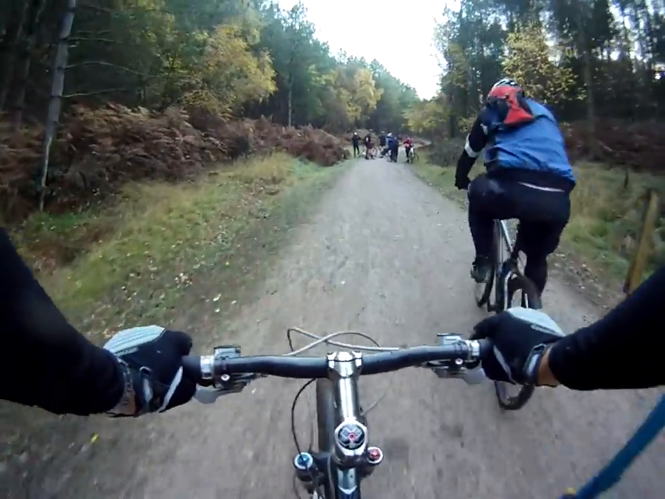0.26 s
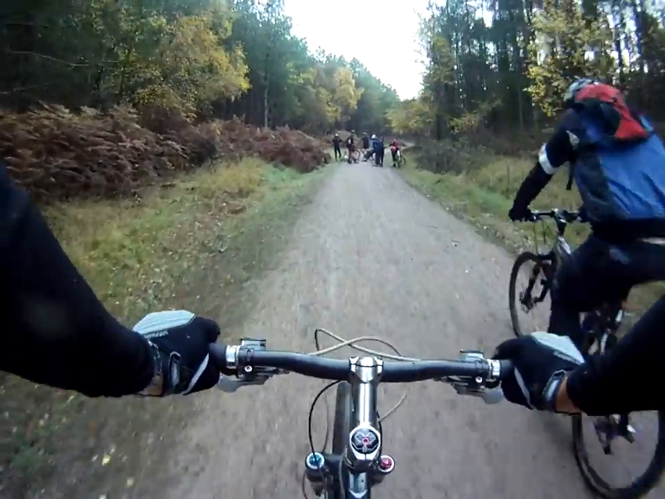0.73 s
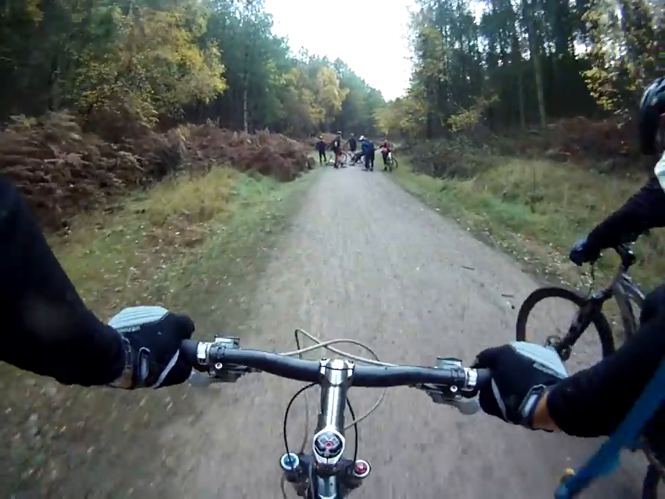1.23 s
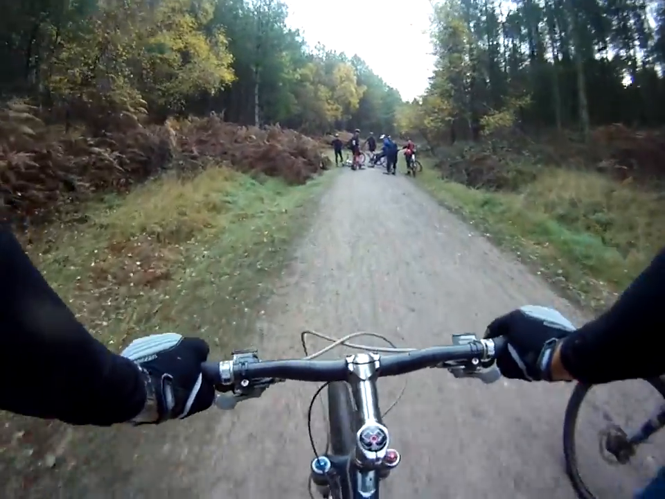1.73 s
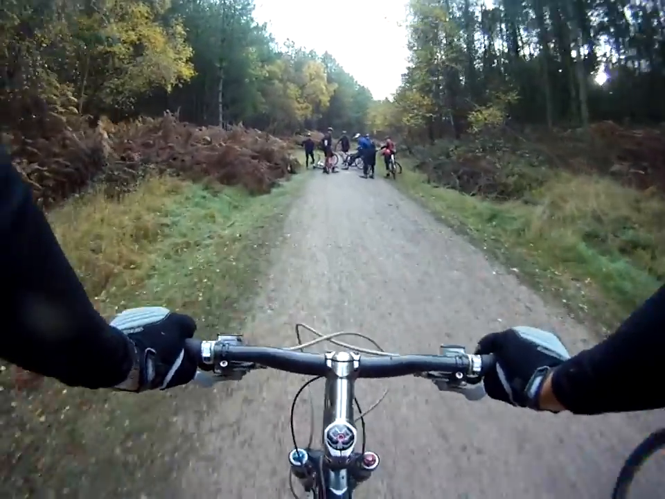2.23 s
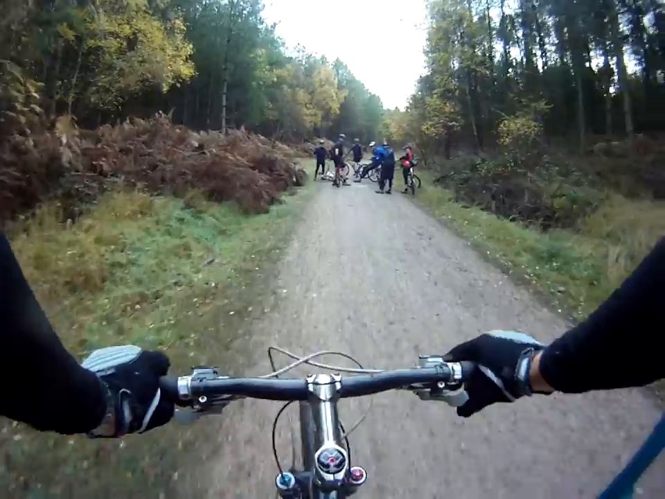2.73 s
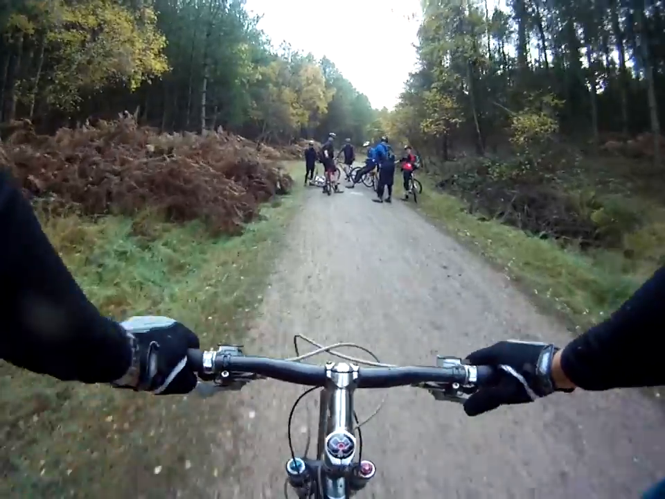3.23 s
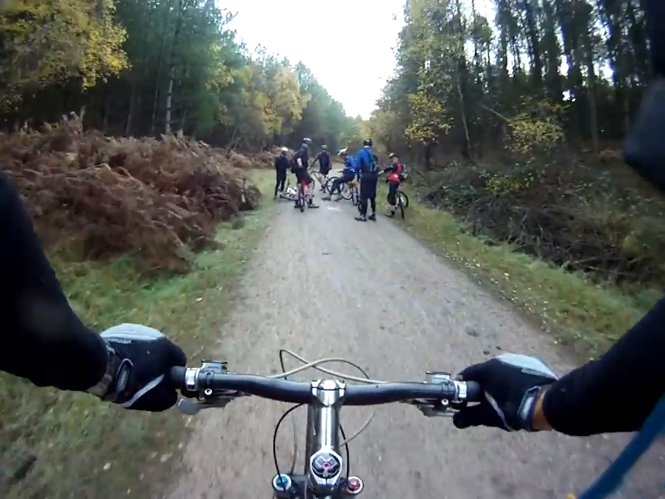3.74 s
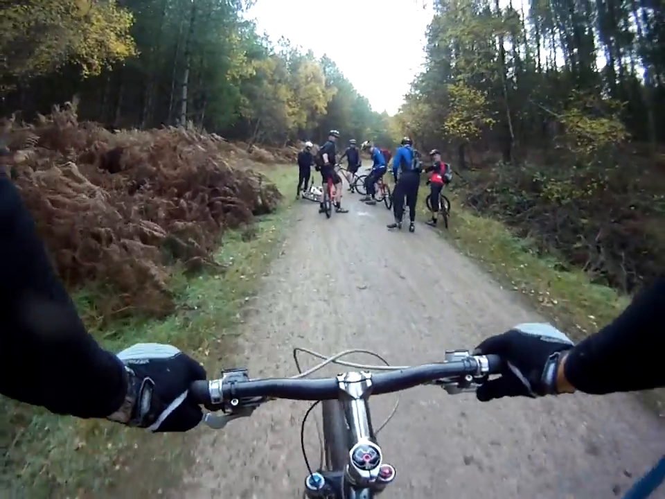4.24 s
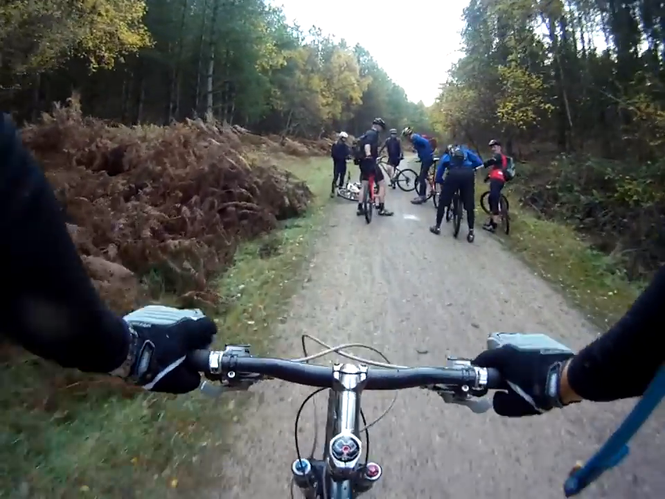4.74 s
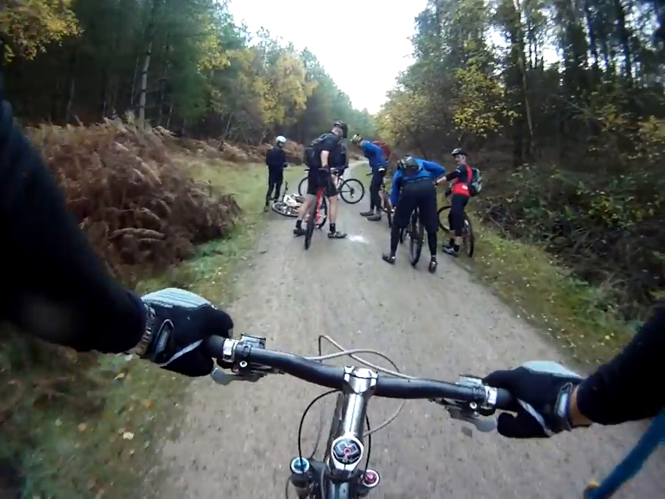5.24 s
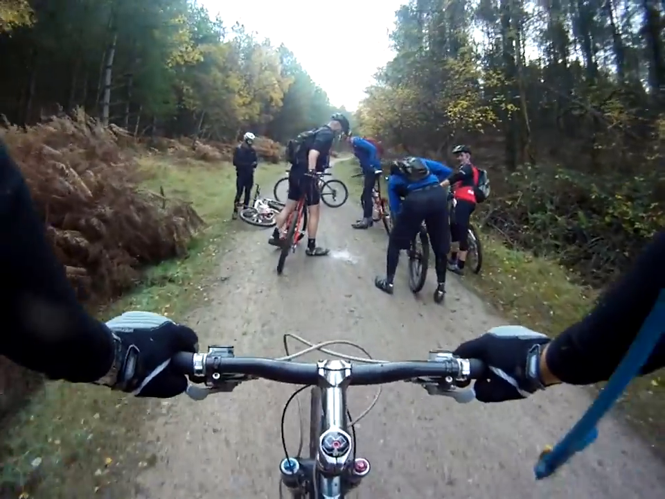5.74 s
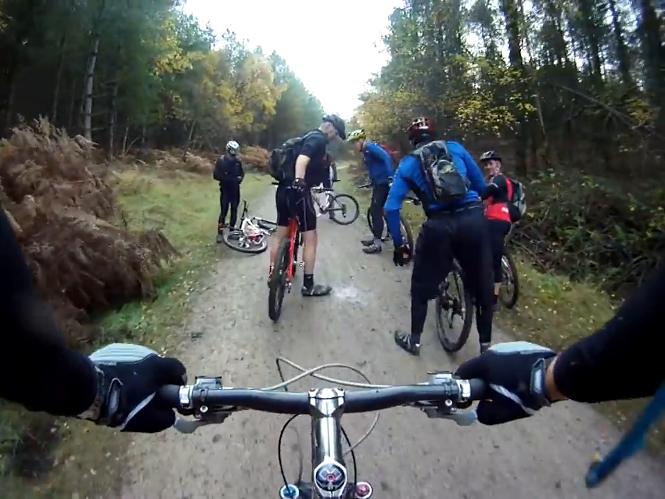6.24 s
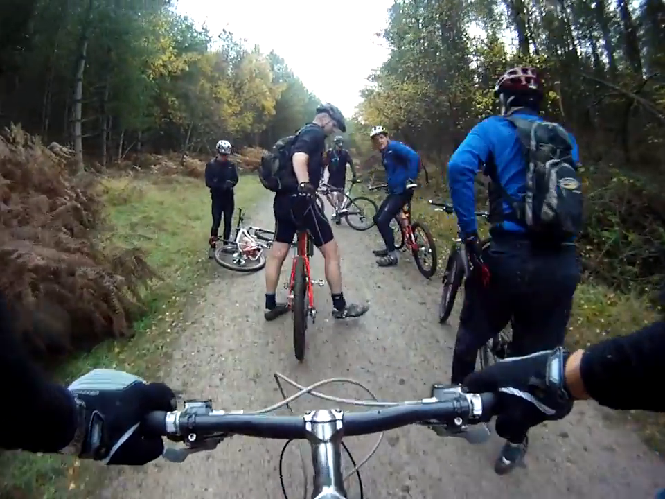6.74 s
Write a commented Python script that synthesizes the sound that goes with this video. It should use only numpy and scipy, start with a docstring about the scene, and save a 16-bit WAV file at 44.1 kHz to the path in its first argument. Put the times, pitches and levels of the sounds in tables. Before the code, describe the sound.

A continuous close, boxy sound of a mountain bike on a gravel forest track, picked up by a cased camera on the rider's chest. It starts fast, with low wind, dense tyre rumble, gritty crunch and a hard clack near 0.1 s, among many stone ticks. By 0.5 s the speed has dropped; jacket scuffs and knocks come around 0.7 to 1.0 s. From about 0.8 to 2.5 s low flutters swell over ruts, with a dull knock near 2.6 s. From 3.1 to 4.8 s the ticks and clacks are hardest, with piercing snaps around 3.6 and 3.7 s, rattling knocks near 3.95 s and a strong low shudder near 4.8 s. Then rolling is gentler, with cloth rubs, a double knock at 5.7 s and further thuds around 6.5 s. Pebbles tick randomly and a glassy fizz covers everything until the end.

```python
"""A mountain bike coasts down a gravel track, heard from a small cased camera on the rider's chest.
It starts fast in wind, tyre rumble (clicks in case resonances) and crunch (clicks in case-wall resonances).
Speed drops within 0.5 s; from 0.8 s to 2.5 s ruts flutter low. From 3.1 s to 4.8 s ticks, knocks and bright
hard clicks, all resonated pushes, are hardest. The slower end has jacket rubs (clicks in fabric resonances)
and knocks. Throughout, small stones tick at random and the camera's held samples put a glassy fizz on top."""
import sys
import numpy as np
from scipy import signal
from scipy.fft import rfft, irfft
from scipy.io import wavfile
from scipy.ndimage import uniform_filter1d

SR = 44100
rng = np.random.default_rng(int(sys.argv[2]) if len(sys.argv) > 2 else 0)


def generate_wav(sig):
    """Save sig (samples, or channels by samples) to the path in sys.argv[1] as 16-bit PCM at SR."""
    pcm = np.round(np.clip(np.atleast_2d(sig).T, -1, 1) * 32767).astype(np.int16)
    wavfile.write(sys.argv[1], SR, pcm)


N = 307818
TIME_S = np.arange(N) / SR


def from_db(db):
    """Amplitude factor of a level in dB."""
    return 10 ** (np.asarray(db) / 20)


def rms_one(x):
    """Scaled to rms 1."""
    return x / np.sqrt(np.mean(x ** 2) + 1e-20)


def peak_one(x):
    """Scaled to peak 1."""
    return x / (np.abs(x).max() + 1e-20)


def low_pass(x, hz, order=2):
    """Causal Butterworth low-pass."""
    return signal.sosfilt(signal.butter(order, hz, fs=SR, output="sos"), x)


def drift(turns_per_s):
    """Smooth random curve of rms 1, with about that many turns a second."""
    hz = np.arange(N // 2 + 1) * SR / N
    spectrum = rfft(rng.standard_normal(N)) / (1 + (hz / turns_per_s) ** 2)
    return rms_one(irfft(spectrum, N))


def in_time(rows):
    """Curve at every sample, straight between rows of (s, value)."""
    return np.interp(TIME_S, *np.transpose(rows))


def resonate(x, hz, width_hz):
    """One two-pole resonance with gain about 1 at its top."""
    r = np.exp(-np.pi * width_hz / SR)
    zeros = np.array([1, 0, -1]) * (1 - r * r) / 2
    poles = [1, -2 * r * np.cos(2 * np.pi * hz / SR), r * r]
    return signal.lfilter(zeros, poles, x + 1e-18)


def body(x, modes):
    """Parallel resonances with alternating signs."""
    out = 0
    for k, (hz, width_hz, db) in enumerate(modes):
        out = out + (-1) ** k * from_db(db) * resonate(x, hz, width_hz)
    return out


def grains(per_s, spread_db, cap):
    """Random clicks of either sign; a positive spread makes a few large, a negative one a few small."""
    excess_db = spread_db * np.minimum(rng.exponential(1, N), cap)
    sizes = from_db(excess_db) * rng.choice([-1, 1], N)
    return sizes * (rng.random(N) < per_s / SR)


def contact(chatter, decay_s):
    """One sharp push, with dying chatter as the surfaces settle."""
    t = TIME_S[:SR // 12]
    return (t == 0) + chatter * rng.standard_normal(len(t)) * np.exp(-t / decay_s)


def add(track, s, sound):
    """Mixes a sound into the track at time s."""
    at = int(np.clip(round(s * SR), 0, N - 1))
    track[at:at + len(sound)] += sound[:N - at]


# Wind spectrum at the microphone. Each row: frequency in Hz, relative level in dB per Hz.
WIND_SPECTRUM = [(12, -14), (25, -6.5), (40, -5), (60, -1), (80, -3.5), (105, -4.5), (150, -15.5),
                 (220, -27), (400, -31), (1000, -36.5)]


def wind():
    """Air stream as shaped noise, its short-term level evened out."""
    hz, db = np.transpose(WIND_SPECTRUM)
    bins_hz = np.arange(N // 2 + 1) * SR / N + 1e-3
    colour = from_db(np.interp(np.log(bins_hz), np.log(hz), db, left=-40, right=-90))
    air = irfft(rfft(rng.standard_normal(N)) * colour, N)
    return air / np.sqrt(uniform_filter1d(air ** 2, SR // 6))


# Rutted stretches that shake the frame. Each row: middle in s, length in s, extra shudder in dB.
RUTS = [(1.053, 0.5, 4.5), (1.826, 0.38, 7.5), (2.303, 0.3, 6.5), (3.08, 0.26, 5.5), (3.562, 0.34, 10.5),
        (4.245, 0.057, 11), (4.41, 0.063, 9), (4.83, 0.63, 13), (6.52, 0.1, 14)]


def ruts():
    """Extra shaking in dB: a parabolic swell over each rutted stretch."""
    extra_db = 0
    for middle_s, length_s, db in RUTS:
        extra_db = extra_db + db * np.maximum(1 - (2 * (TIME_S - middle_s) / length_s) ** 2, 0)
    return extra_db


def shudder():
    """Shaking of frame and rider: a dull low flutter of clicks through two resonances."""
    shakes = grains(900, spread_db=1.5, cap=5.1)
    return rms_one(resonate(resonate(shakes, 147, 133), 152, 150))


# Boom of case and mount. Each row: frequency in Hz, width in Hz, relative level in dB.
BOOM_MODES = [(227, 42, -1), (301, 120, 3.5), (430, 109, 5.5), (529, 129, 7.5), (629, 304, -2.5)]
# Rasp of the fabric weave. Each row: frequency in Hz, width in Hz, relative level in dB.
WEAVE_MODES = [(1460, 780, 7), (2550, 800, 14.5), (3330, 270, 13), (4070, 1130, 0)]
# Jacket rubs on the case. Each row: start in s, rise in s, fall in s, scuff in dB, rasp in dB.
RUBS = [(0.033, 0.018, 0.023, -50, -33.5), (0.094, 0.02, 0.14, -33.5, -39.5),
        (0.689, 0.029, 0.25, -24, -36.5), (0.99, 0.0066, 0.075, -27.5, -36), (4.04, 0.01, 0.033, -34, -47),
        (5.232, 0.023, 0.19, -35.5, -43.5), (5.723, 0.012, 0.037, -28, -34),
        (5.828, 0.02, 0.11, -37.5, -49), (6.365, 0.017, 0.0087, -39, -35.5),
        (6.556, 0.025, 0.063, -30, -37), (6.612, 0.078, 0.21, -35.5, -46.5),
        (6.885, 0.013, 0.018, -49, -38.5)]
SWISH_HZ, SWISH_WIDTH_HZ = 4500, 1340
# swish under the scuff of a hard rub, the scuff level of such a rub, extra swish dB per scuff dB
SWISH_DB, HARD_RUB_DB, SWISH_GROWTH = -14.5, -23.5, 0.56


def rubs():
    """Cloth sticks and slips on the case: hollow scuff, rasp, and a swish that grows with the scuff."""
    slips = grains(1200, spread_db=3.0, cap=3.5)
    scuff = rms_one(low_pass(body(slips, BOOM_MODES[1:]), 1200))
    rasp = rms_one(body(slips + 0.14 * rng.standard_normal(N), WEAVE_MODES))
    swish = resonate(slips, SWISH_HZ, SWISH_WIDTH_HZ)
    swish = rms_one(resonate(swish, SWISH_HZ, SWISH_WIDTH_HZ))
    out = np.zeros(N)
    for s, rise_s, fall_s, scuff_db, rasp_db in RUBS:
        pressure = np.interp(TIME_S - s, [0, rise_s, rise_s + fall_s], [0, 1, 0]) ** 0.66
        swish_db = scuff_db + SWISH_DB + SWISH_GROWTH * (scuff_db - HARD_RUB_DB)
        rub = from_db(scuff_db) * scuff + from_db(rasp_db) * rasp + from_db(swish_db) * swish
        out += pressure * rub
    return out


# Knocks and bright hard clicks, some with hardly any thud. Each row: time in s, thud peak in dB,
# thud pitch in Hz, clack level in dB, clack pitch in Hz, chatter decay in s, gap to the first rebound
# in s (2 ms or less: no rebound).
KNOCKS_AND_CLICKS = [(0.084, -18.5, 600, -11, 2110, 0.01, 0.0031),
                     (0.728, -17, 465, -31, 2520, 0.0034, 0.039),
                     (1.001, -20.5, 593, -18.5, 3500, 0.0079, 0.0047),
                     (1.213, -38, 1000, -19.5, 1730, 0.002, 0.0011),
                     (2.577, -16, 342, -24.5, 2620, 0.0021, 0),
                     (3.473, -31, 1050, -18, 2100, 0.0017, 0.0011),
                     (3.6197, -27, 596, -13, 4670, 0.0013, 0.0036), (3.708, -20, 600, -5, 2400, 0.00088, 0),
                     (3.9208, -44, 602, -16.5, 4560, 0.00063, 0.00027),
                     (3.935, -15.5, 404.7, -9, 4500, 0.0017, 0.0066),
                     (3.954, -13, 700, -19.5, 1100, 0.00096, 0.0024),
                     (4.017, -25, 628, -39, 2800, 0.006, 0),
                     (4.573, -28.5, 840, -16.5, 3700, 0.0025, 0.0027),
                     (4.756, -17, 549, -22, 2250, 0.0038, 0.0047),
                     (4.806, -15, 517, -19, 2340, 0.0023, 0.0009),
                     (5.709, -11.5, 394, -13.5, 2150, 0.0028, 0.031),
                     (5.712, -19, 1070, -9, 2600, 0.003, 0.0011),
                     (6.305, -23.5, 526.2, -38, 1180, 0.0082, 0),
                     (6.505, -15.5, 430, -27.5, 2569, 0.0027, 0.0026),
                     (6.56, -23.5, 510, -23, 2100, 0.022, 0.00055),
                     (6.689, -19.5, 492, -25.5, 2220, 0.0073, 0)]
REBOUND_GAP_RATIO, REBOUND_THUD_LOSS_DB, REBOUND_CLACK_LOSS_DB = 0.46, 3.5, 12.5


def hits():
    """Every knock or click; some rebound twice, each time sooner and softer, the clack fading faster."""
    for s, thud_db, thud_hz, clack_db, clack_hz, decay_s, gap_s in KNOCKS_AND_CLICKS:
        for k in range(3 if gap_s > .002 else 1):
            hit_thud_db = thud_db - k * REBOUND_THUD_LOSS_DB
            hit_clack_db = clack_db - k * REBOUND_CLACK_LOSS_DB
            yield s, hit_thud_db, thud_hz, hit_clack_db, clack_hz, decay_s
            s = s + gap_s * REBOUND_GAP_RATIO ** k


# Ring of plastic struck directly. Each row: frequency in Hz, width in Hz, relative level in dB.
PLASTIC_MODES = [(1100, 270, 0), (2100, 130, 11.5), (2800, 710, 8.5), (3500, 140, -4), (4600, 370, -21)]


def knocks_and_clicks():
    """Each hit sums a hollow thud, at times very faint, and a hard clack at its own pitch."""
    out = np.zeros(N)
    for s, thud_db, thud_hz, clack_db, clack_hz, decay_s in hits():
        push = resonate(contact(chatter=0.053, decay_s=decay_s), thud_hz, 290)
        thud = peak_one(resonate(push, thud_hz, 0.5 / max(decay_s, .001)))
        spot = peak_one(resonate(contact(chatter=.06, decay_s=decay_s), clack_hz, clack_hz / 6))
        # the lower the clack, the duller its rattle
        rattle = body(contact(chatter=0.94, decay_s=decay_s), PLASTIC_MODES)
        rattle = peak_one(low_pass(rattle, 3.0 * clack_hz, order=3))
        clack = from_db(3.5) * spot + from_db(-3.5) * rattle
        add(out, s, from_db(thud_db) * thud + from_db(clack_db) * clack)
    return out


PEBBLES_PER_S = 17.0  # at cruising speed
PEBBLE_OVER_GRAVEL_DB, PEBBLE_SPREAD_DB = 16.5, 2.2
PEBBLE_HZ, PEBBLE_SPREAD_HZ = 2900, 370


def pebbles(speed, gravel_db):
    """Small stones leave the tread at random, more at speed: rows of (s, level in dB, pitch in Hz)."""
    at = np.flatnonzero(rng.random(N) < PEBBLES_PER_S * speed ** 2 / SR)
    size, pitch = rng.standard_normal((len(at), 2)).T
    level_db = gravel_db[at] + PEBBLE_OVER_GRAVEL_DB + PEBBLE_SPREAD_DB * size
    return zip(TIME_S[at], level_db, PEBBLE_HZ + PEBBLE_SPREAD_HZ * pitch)


# Ring of the thin case wall. Each row: frequency in Hz, width in Hz, relative level in dB.
WALL_MODES = [(1047, 490, -9.5), (2263, 465, -3.5), (2820, 384, 2), (3218, 460, -0.5), (3696, 196, -4),
              (4670, 600, -11.5)]
# Larger stones flung against the bike. Each row: time in s, level in dB, pitch in Hz.
STONES = [(0.0498, -19, 2320), (0.0934, -18, 2200), (0.172, -12.5, 2540), (0.2239, -21.5, 2450),
          (0.4247, -14, 2800), (0.4965, -16, 2730), (0.973, -21.5, 3130), (1.2145, -18, 3365),
          (1.3278, -16.5, 2780), (1.4052, -20, 3060), (1.638, -17.5, 3040), (1.7259, -19.5, 2800),
          (1.7699, -18.5, 3170), (1.9426, -22, 2973), (2.1232, -21, 2820), (2.457, -23, 2950),
          (2.8946, -20, 2976), (2.9156, -18, 2820), (3.1656, -17.5, 3250), (3.246, -21.5, 2670),
          (3.3166, -15, 2800), (3.403, -20, 2800), (3.472, -11.5, 2820), (3.5139, -20, 3160),
          (3.6241, -1.5, 2970), (3.705, -16, 2900), (3.7082, 0.5, 3110), (3.8293, -20, 2940),
          (3.9654, -23, 3020), (4.001, -17.5, 2390), (4.255, -15.5, 3080), (4.3862, -18, 3150),
          (4.4933, -23.5, 3440), (4.5724, -10.5, 2730), (4.793, -8.5, 2754), (4.8448, -19.5, 2818),
          (5.078, -19.5, 3134), (6.2396, -20, 3127), (6.3362, -24, 2750), (6.573, -13, 2800),
          (6.8331, -21, 2230)]
WALL_RING_DB = -11.0  # relative to each tick


def ticks(stones):
    """A hard tick swells for a few cycles and dies within milliseconds, with a fainter wall ring."""
    out = np.zeros(N)
    for s, db, hz in stones:
        snap = resonate(contact(chatter=0.051, decay_s=0.0038), hz, 1420)
        swell = resonate(resonate(snap, hz, 690), hz, 1320)
        tick = peak_one(swell) + from_db(-22) * peak_one(snap)
        ring = body(contact(chatter=0.99, decay_s=0.0037), WALL_MODES)
        ring = peak_one(low_pass(ring, 8600))
        add(out, s, from_db(db) * (peak_one(tick) + from_db(WALL_RING_DB) * ring))
    return out


def rumble():
    """Tread blocks drum on the dirt as dense clicks; the shaking booms in the case."""
    drumming = grains(2500, spread_db=-0.5, cap=5.1) * from_db(1.97 * drift(24))
    return rms_one(low_pass(body(drumming, BOOM_MODES), 960, order=3))


def crunch():
    """Grit cracks in clusters, in seven pitch bands, with the finer hiss of sand."""
    clusters = from_db(2.5 * drift(35))
    cracks = 0
    for hz in np.linspace(2300, 3600, 7):
        snaps = grains(100, spread_db=4.5, cap=3) * clusters
        cracks = cracks + resonate(body(snaps, WALL_MODES), hz, 1600)
    sand = rms_one(body(rng.standard_normal(N), WALL_MODES)) * from_db(3.0 * drift(38))
    spray = from_db(-22.5) * rng.standard_normal(N)
    return rms_one(rms_one(cracks) + .9 * sand + spray)


# Bike speed. Each row: time in s, speed in m/s.
SPEED = [(0.0, 5.9), (0.2, 6.4), (0.5, 4.57), (1.4, 4.9), (2.05, 3.93), (2.9, 3.95), (4.3, 3.45),
         (5.1, 3.07), (6.2, 3.1), (6.98, 2.96)]
# Looseness of the gravel under the tyres. Each row: time in s, base level of the crunch in dB.
GRAVEL = [(0.0, -41.5), (0.23, -43.5), (0.43, -42), (0.87, -43), (1.05, -43), (2.68, -42.5), (2.78, -43),
          (3.52, -44.5), (3.6, -42.5), (4.04, -46.5), (4.45, -44.5), (4.55, -45.5), (5.52, -45),
          (5.66, -46), (6.47, -47), (6.71, -43.5), (6.98, -45.5)]
CRUISE_M_PER_S = 4.0
# level at cruising speed, gain when the speed doubles
WIND_DB, WIND_DOUBLING_DB = -40.5, 10
SHUDDER_DB, SHUDDER_DOUBLING_DB = -48, 16
RUMBLE_DB, RUMBLE_DOUBLING_DB = -40.0, 9.0
CRUNCH_OVER_GRAVEL_DB = 2.2
RUT_WIND_SHARE = 0.45  # share of the rut dB that joggles the microphone in the air stream
GUST_DB, GUSTS_PER_S = 2.0, 14
SHUDDER_SWAY_DB, SWAYS_PER_S = 1.7, 12.0
PATCH_DB, PATCHES_PER_S = 0.86, 7.9  # coarser and finer ground


def scene():
    """Speed sets wind, shudder and rumble, ruts add to the first two; gravel sets crunch and pebbles."""
    speed = in_time(SPEED) / CRUISE_M_PER_S
    gravel_db = in_time(GRAVEL)
    doublings = np.log2(speed)
    rut_db = ruts()
    patch_db = PATCH_DB * drift(PATCHES_PER_S)

    wind_db = WIND_DB + WIND_DOUBLING_DB * doublings + RUT_WIND_SHARE * rut_db
    wind_db = wind_db + GUST_DB * drift(GUSTS_PER_S)
    shudder_db = SHUDDER_DB + SHUDDER_DOUBLING_DB * doublings + rut_db
    shudder_db = shudder_db + SHUDDER_SWAY_DB * drift(SWAYS_PER_S)
    rumble_db = RUMBLE_DB + RUMBLE_DOUBLING_DB * doublings + patch_db
    crunch_db = CRUNCH_OVER_GRAVEL_DB + gravel_db + patch_db

    buffeting = from_db(wind_db) * wind() + from_db(shudder_db) * shudder()
    contacts = rubs() + knocks_and_clicks() + ticks(STONES) + ticks(pebbles(speed, gravel_db))
    rolling = from_db(rumble_db) * rumble() + from_db(crunch_db) * crunch()
    return (buffeting + contacts + rolling)[None]


CAMERA_RATE_HZ, HOLD_STEPS = 12000, 8
CUTOFF_HZ = 15300


def record(dry):
    """The camera samples slowly and holds each value, which mirrors the sound into the treble."""
    sampled = signal.resample_poly(low_pass(dry[0], 9300, order=6), CAMERA_RATE_HZ, SR)
    held = np.repeat(np.clip(sampled, -1, 1), HOLD_STEPS)
    out = signal.resample_poly(held, SR, HOLD_STEPS * CAMERA_RATE_HZ)[:N]
    steep_low_pass = signal.ellip(10, .2, 70, CUTOFF_HZ, fs=SR, output="sos")
    return signal.sosfilt(steep_low_pass, out)[None]


dry = scene()
out = record(dry)
generate_wav(out)
```